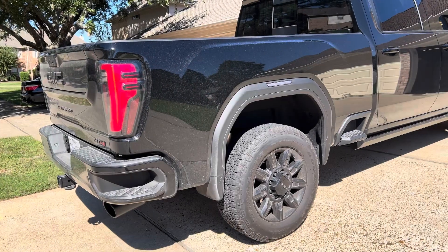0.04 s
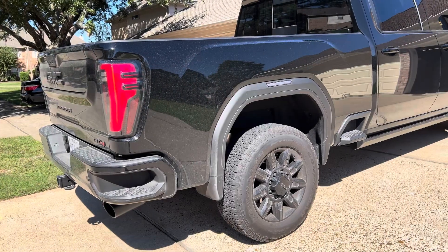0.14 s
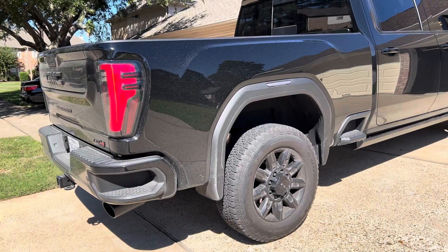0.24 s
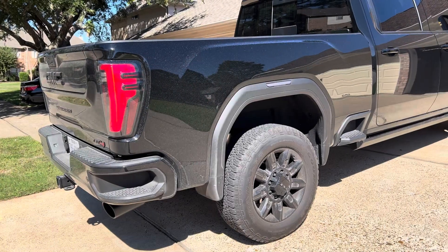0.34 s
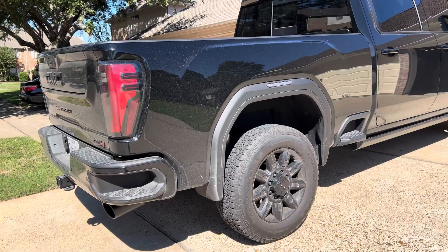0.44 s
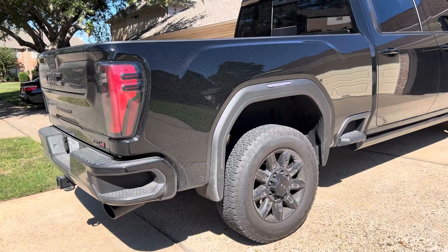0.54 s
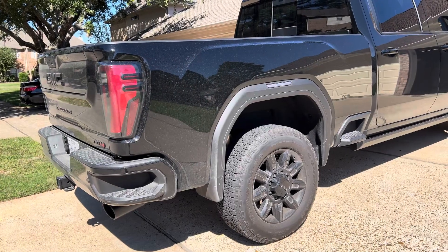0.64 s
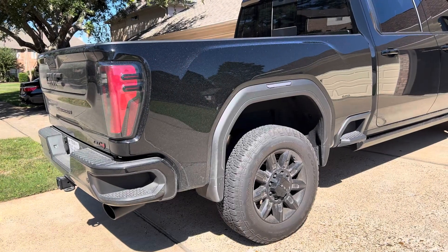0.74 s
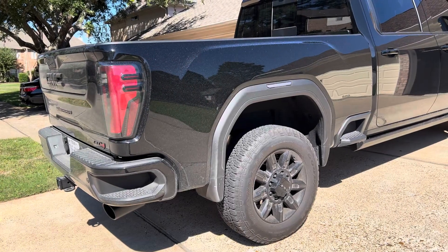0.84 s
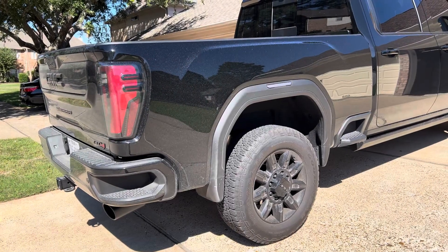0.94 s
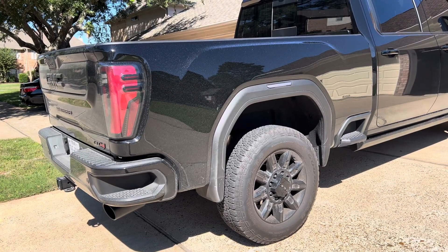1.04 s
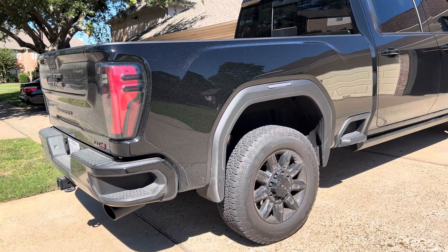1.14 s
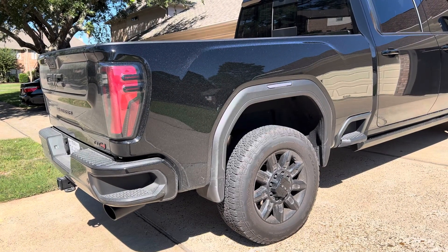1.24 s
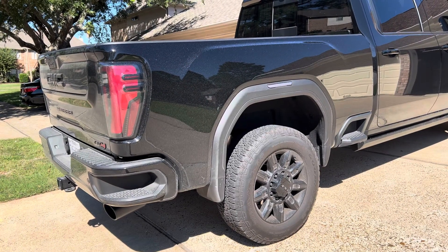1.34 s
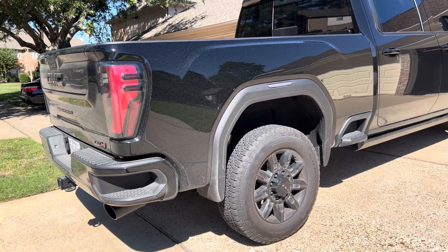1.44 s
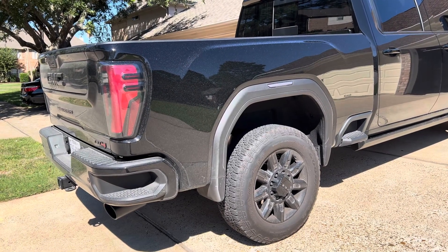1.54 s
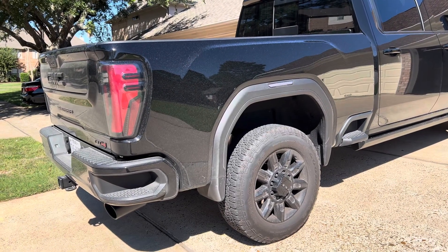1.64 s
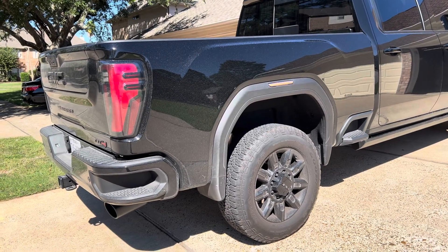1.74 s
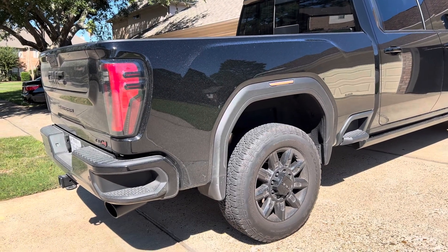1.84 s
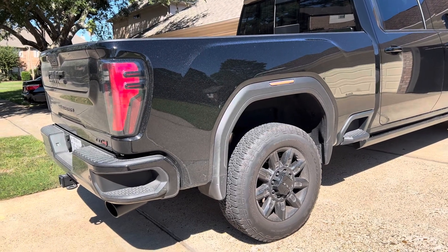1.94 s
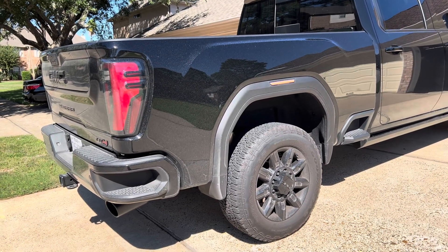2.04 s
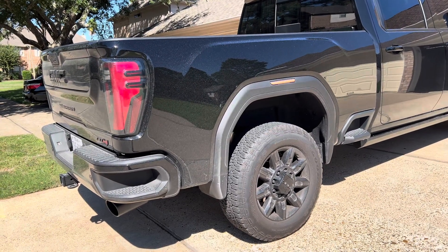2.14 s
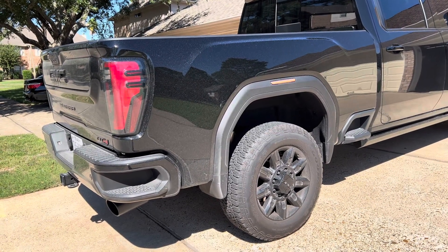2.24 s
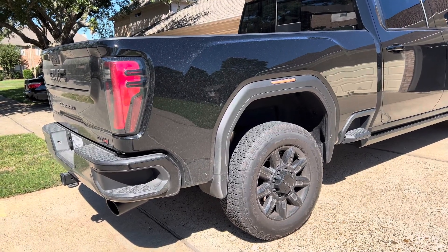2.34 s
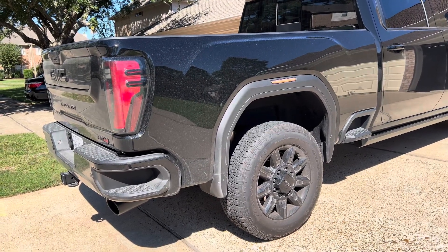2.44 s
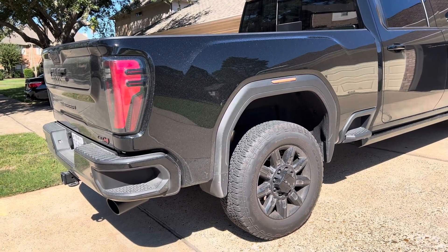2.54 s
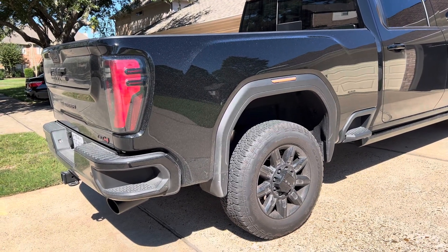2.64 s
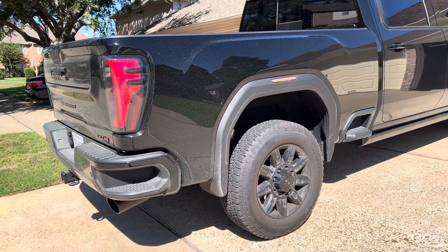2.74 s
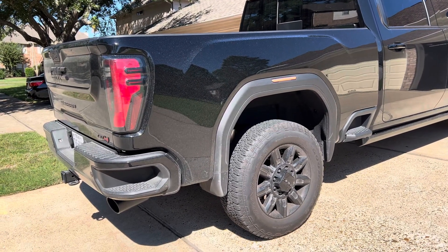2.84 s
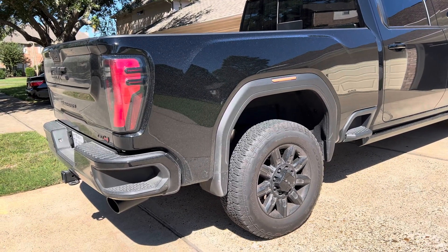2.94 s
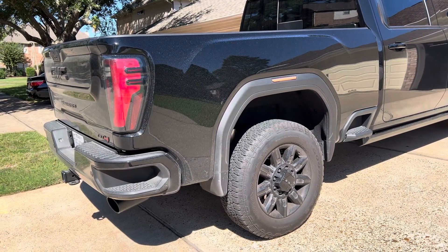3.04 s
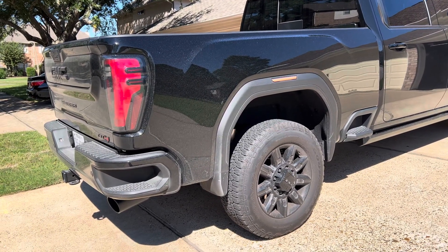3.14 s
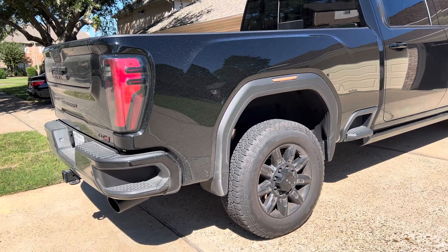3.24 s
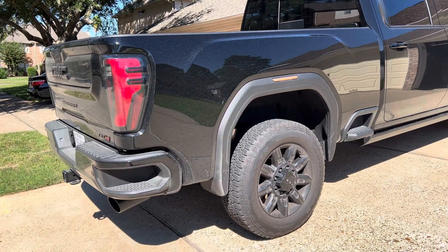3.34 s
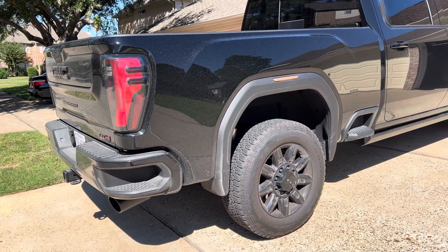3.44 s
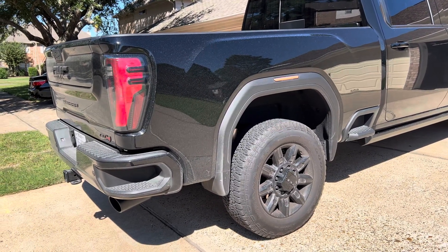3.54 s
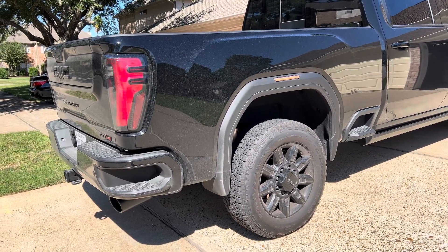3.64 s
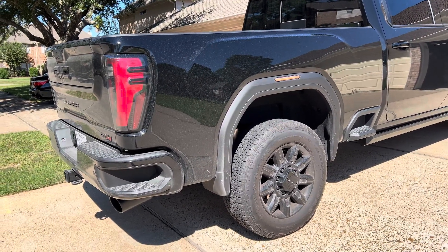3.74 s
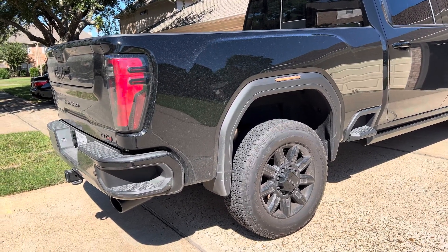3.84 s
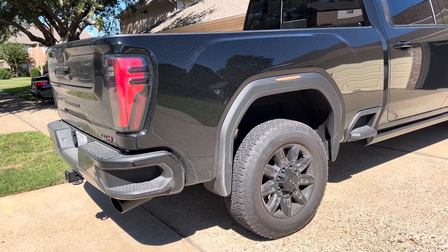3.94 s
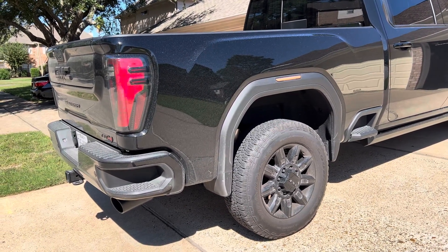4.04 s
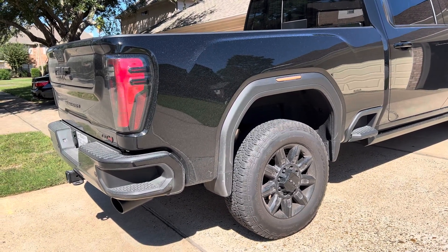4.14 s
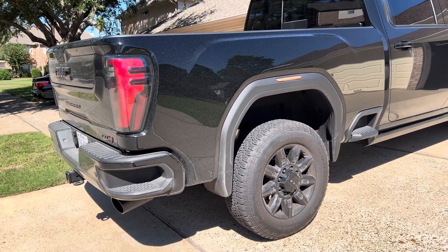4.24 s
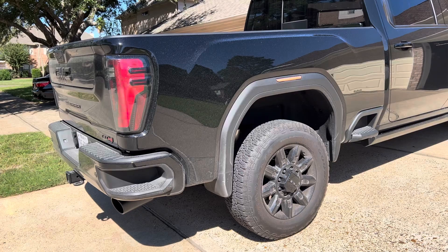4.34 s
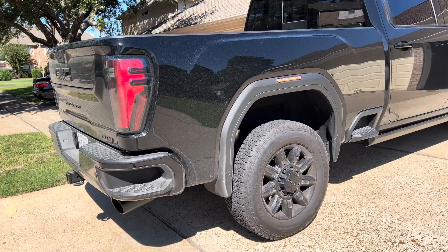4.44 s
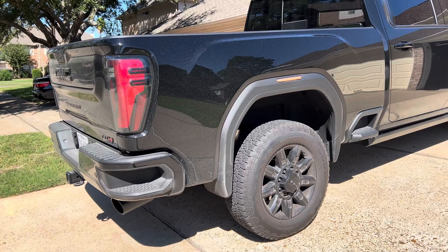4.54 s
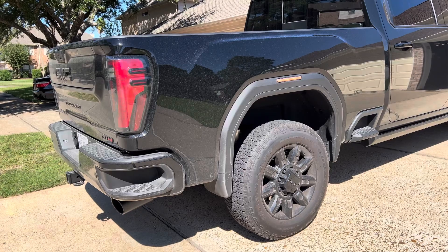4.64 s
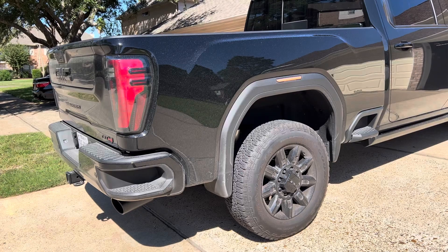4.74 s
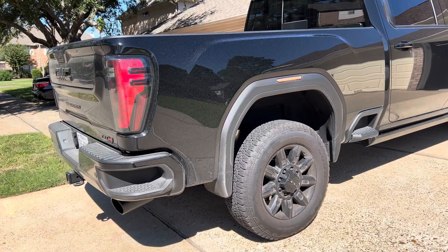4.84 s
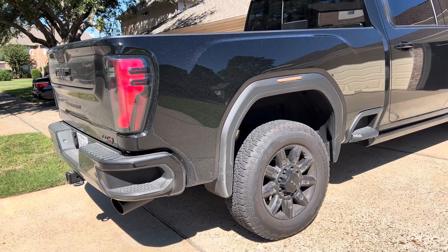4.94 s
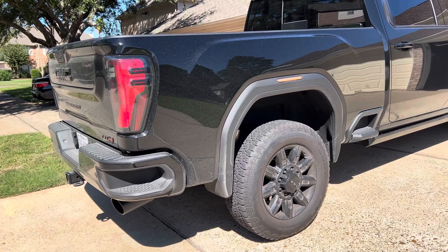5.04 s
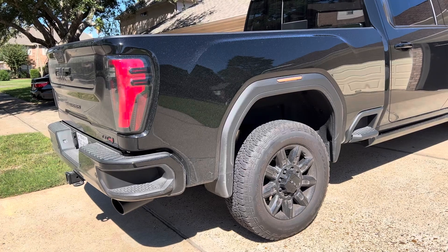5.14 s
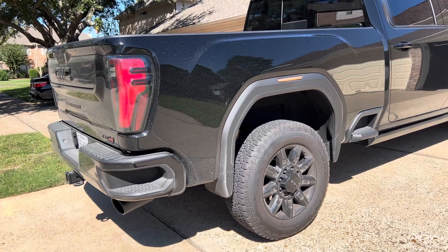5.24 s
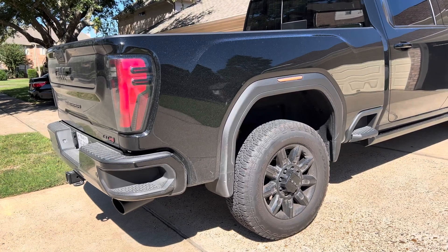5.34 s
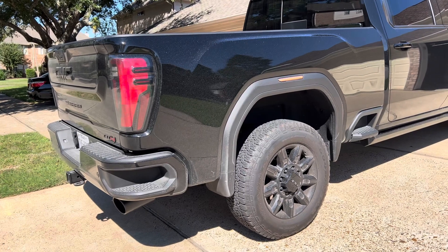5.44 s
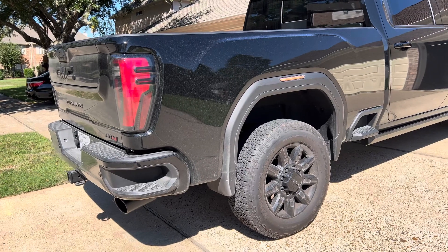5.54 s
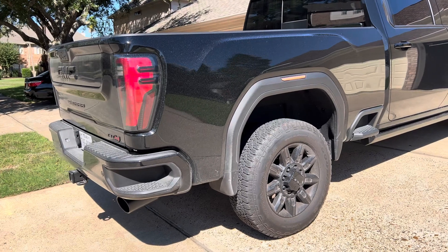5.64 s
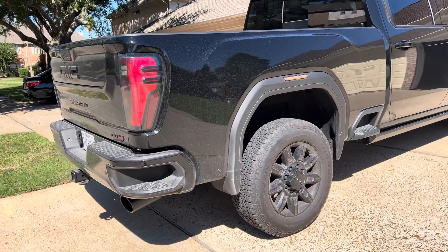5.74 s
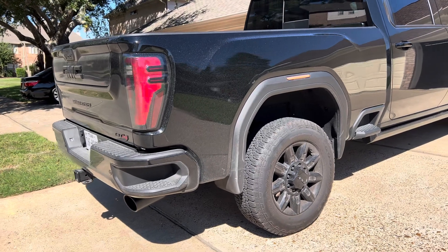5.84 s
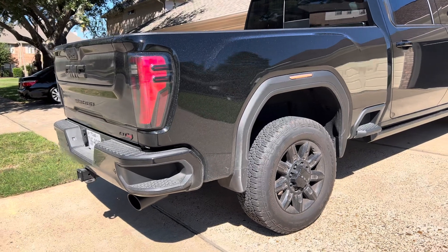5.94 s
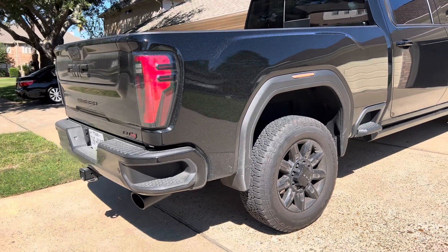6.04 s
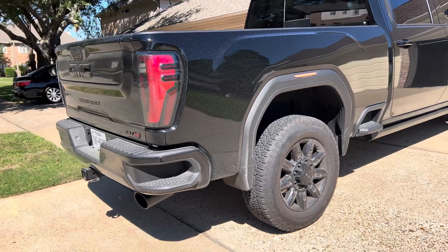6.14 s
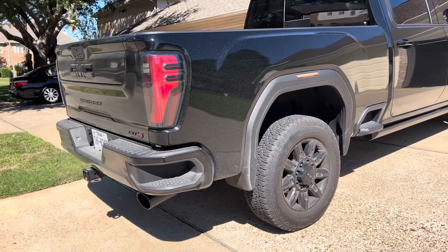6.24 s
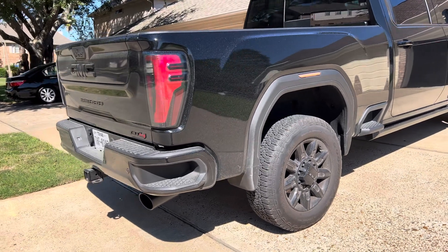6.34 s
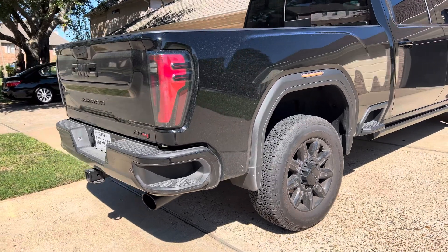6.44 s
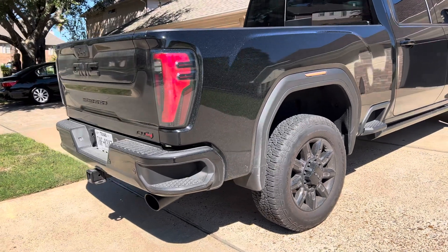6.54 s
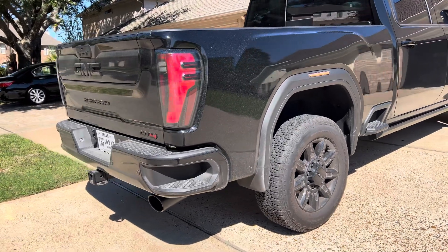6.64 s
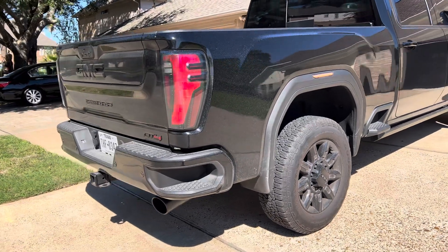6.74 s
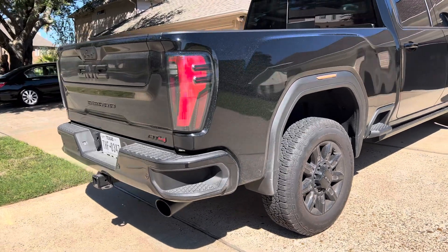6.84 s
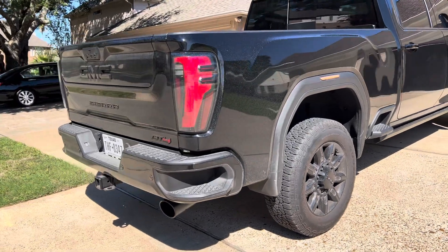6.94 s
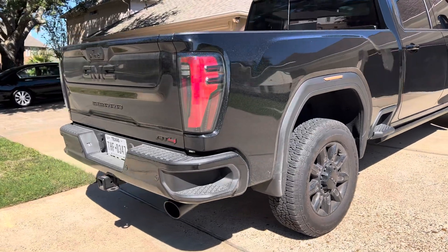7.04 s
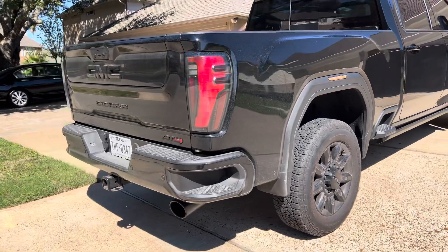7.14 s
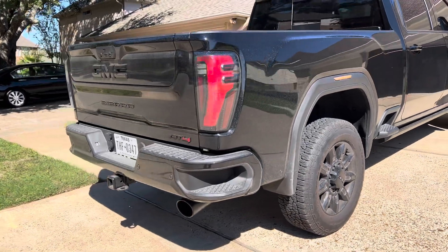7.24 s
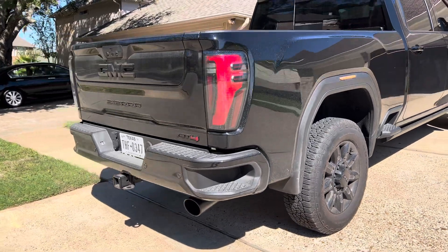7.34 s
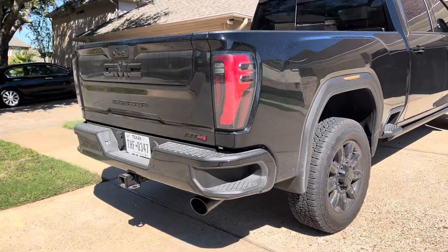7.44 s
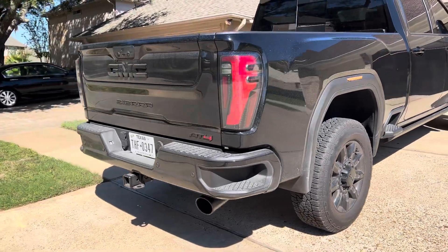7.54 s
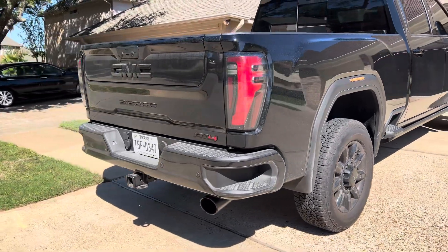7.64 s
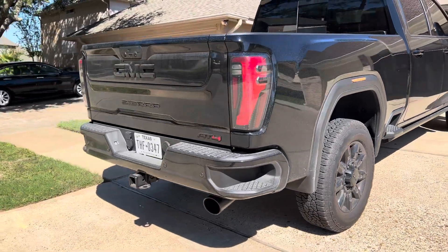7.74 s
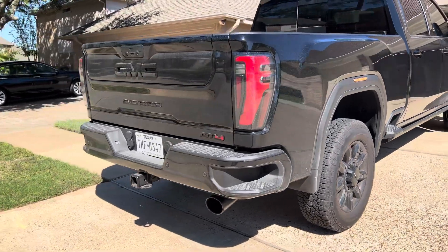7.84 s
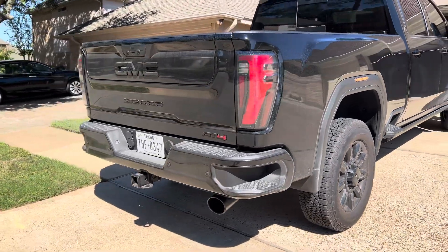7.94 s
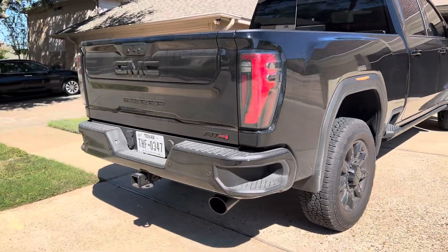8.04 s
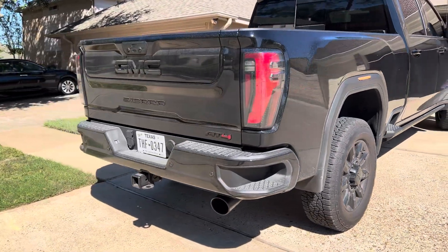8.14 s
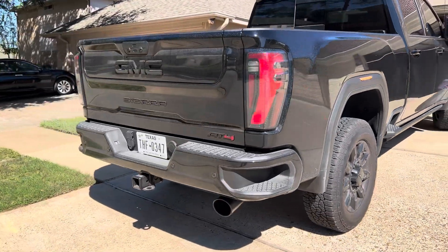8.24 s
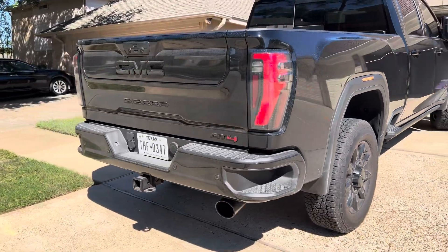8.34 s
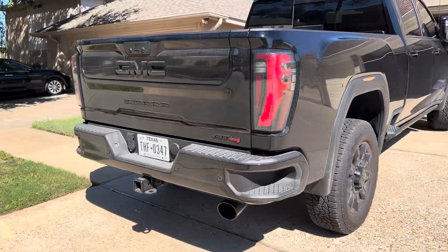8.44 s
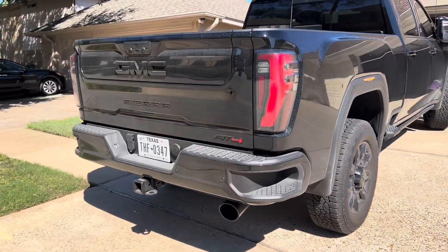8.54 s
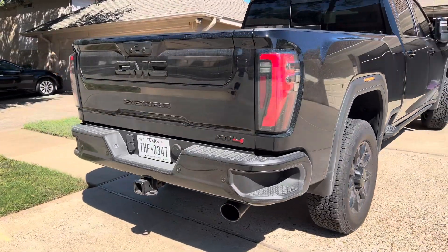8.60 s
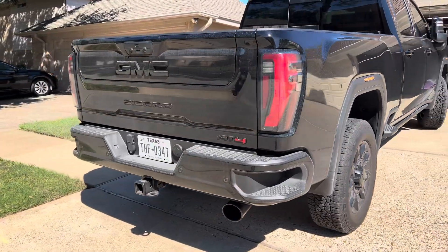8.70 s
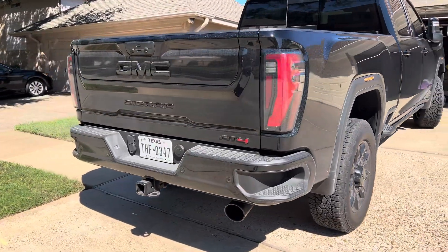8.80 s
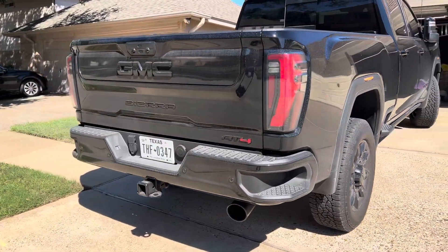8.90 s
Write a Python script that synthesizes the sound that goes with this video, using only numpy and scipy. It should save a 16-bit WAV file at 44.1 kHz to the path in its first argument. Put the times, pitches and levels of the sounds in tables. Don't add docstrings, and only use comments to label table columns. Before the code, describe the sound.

Faint fuel pump whine, rattling starter strokes, then a large truck engine fires up loudly and holds a throaty, burbling cold idle outdoors.

```python
import sys
import numpy as np
from scipy import signal
from scipy.fft import rfft, irfft, next_fast_len
from scipy.io import wavfile
from scipy.ndimage import uniform_filter1d

SR = 44100
rng = np.random.default_rng(int(sys.argv[2]) if len(sys.argv) > 2 else 0)


def voltage_ratio(level):
    return 10 ** (np.asarray(level, float) / 20)


def int16_out(signal):
    q = np.round(np.clip(np.atleast_2d(signal).T, -1, 1) * 32767)
    wavfile.write(sys.argv[1], SR, q.astype(np.int16))


N = 395577
T = np.arange(N) / SR
LATE = np.clip((T - 2) / 7, 0, 1)
QUARTER_TURN = np.array([[0], [.25]])


def evened(x):
    return x / np.sqrt(np.mean(x ** 2) + 1e-20)


def read(points, hz):
    f, value = np.transpose(points)
    return np.interp(np.log(hz + 1), np.log(f + 1), value)


def curves(rows):
    s, *columns = np.transpose(rows)
    on = uniform_filter1d(1. * (T > s[0]) * (T < s[-1]), size=300)
    return [np.interp(T, s, c) for c in columns] + [on]


def fade(since_s, time_s):
    return np.exp(-np.maximum(T - since_s, 0) / time_s)


def drift(hz):
    slow = signal.butter(1, hz, fs=SR, output="sos")
    return evened(signal.sosfiltfilt(slow, rng.standard_normal(N)))


def hiss(points, patchy_db):
    frames, hz = N // 256 + 5, np.fft.rfftfreq(1024, 1 / SR)
    a, b, c, d, patches = rng.standard_normal((frames, 513, 5)).T
    patches = uniform_filter1d(patches, size=10, axis=0)
    patches = evened(uniform_filter1d(patches, size=8, axis=1))
    colour_db = read(points, hz)[:, None]
    z = np.array([a + 1j * b, c + 1j * d]) * voltage_ratio(colour_db + patchy_db * patches)
    return evened(signal.istft(z, nperseg=1024, noverlap=768)[1][:, :N])


def resonate(x, hz, width):
    turn = np.exp(2j * np.pi * np.cumsum(hz * np.ones(N)) / SR)
    r = np.exp(-np.pi * width / SR)
    return 2 * (turn * signal.lfilter([1 - r], [1, -r], x / turn + 1e-18)).real


def tone(hz, waver):
    turns = np.cumsum(hz * (1 + waver * drift(30))) / SR
    return np.sqrt(2) * np.sin(2 * np.pi * (turns + QUARTER_TURN))


# time in seconds, firings per second.
SPEED = [(1.5, 78.7), (1.6, 82.1), (1.7, 90.85), (1.9, 94.76), (2.1, 93.17), (2.3, 89.0), (2.6, 87.8),
         (3.4, 85.33), (3.6, 83.76), (4.2, 84.12), (5.2, 82.03), (5.4, 82.72), (6.6, 82.23), (6.8, 81.18),
         (7.2, 82.58), (8.97, 80.3)]
FIRST_FIRING_S = SPEED[0][0]
FIRST_TURN = -.059
IDLE_RATE, CATCH_S = 82, 1.56


def cycles():
    rate, on = curves(SPEED)
    return np.cumsum(rate * (T > FIRST_FIRING_S)) / SR / 8 - FIRST_TURN, rate


# puff level in dB, pipe delay in ms, strength of the manifold echo (gain), echo delay in ms.
CYLINDERS = [
    (1.41, 4.74, 0.09, 12.0),
    (0.85, 4.31, 0.37, 8.28),
    (1.18, 4.41, 0.1, 8.91),
    (-0.52, 5.52, 0.43, 5.41),
    (0.16, 3.93, 0.47, 7.07),
    (1.4, 3.76, 0.28, 3.0),
    (-1.67, 4.13, -0.46, 5.28),
    (-0.86, 3.76, -0.71, 5.68),
]


def exhaust_puffs(turns):
    spread_db = 1.1 + 2.5 * fade(CATCH_S, .3)
    firings = 8 * turns
    at = np.flatnonzero(np.diff(np.floor(firings)) * (T[1:] > FIRST_FIRING_S))
    cylinder = np.floor(firings[at + 1]).astype(int) % 8
    puff_db, delay_ms, echo, echo_delay_ms = np.array(CYLINDERS)[cylinder].T
    chance = rng.standard_normal((len(at), 3))
    size = voltage_ratio(puff_db + .6 * spread_db[at] * chance[:, 0])
    start = at + (delay_ms + .05 * spread_db[at] * chance[:, 1]) * SR / 1000
    echo_start = start + echo_delay_ms * SR / 1000
    puffs = np.zeros(N + SR)
    np.add.at(puffs, start.astype(int), size)
    np.add.at(puffs, echo_start.astype(int), size * (echo + .035 * chance[:, 2]))
    return puffs[:N]


# frequency in Hz, level in dB.
PIPE = [(30, -33.4), (52, -15.8), (68, -24.2), (85, -21.1), (105, -15.4), (130, -21.2), (170, -26.4),
        (215, -26.3), (240, -54.3), (280, -44), (320, -40.9), (360, -50.5), (410, -47.8), (480, -62.8)]


def pipe_response():
    gain = np.log(voltage_ratio(read([*PIPE, (900, -100)], np.fft.rfftfreq(4096, 8 / SR))))
    fold = np.r_[1, 2 * np.ones(2047), 1, np.zeros(2047)]
    ring = irfft(np.exp(rfft(irfft(gain) * fold)))[:2048]
    return signal.resample_poly(ring, 8, 1)


# multiple of the engine cycle, level against the note in dB at the flare, the same at the end.
OVERTONES = [(23, -19.5, -24.5), (24, -38.5, -30), (30, -25, -29), (32, -32.5, -34.5), (40, -55, -27.5)]


def exhaust_note(puffs, turns, rate):
    note = signal.oaconvolve(puffs, pipe_response())[:N]
    note /= np.sqrt(uniform_filter1d(note ** 2, size=16384) + 1e-12)
    note += (.7 - 1.277 * LATE ** 0.88) * resonate(note, 2 * rate, 42)
    note += 0.18 * np.exp(-abs(T - 1.9) / 0.46) * resonate(note, rate, 5.1)
    note += (2.2 - 2.27 * LATE) * resonate(note, 21 / 8 * rate, 1.8)
    overshoot_db = 0.3 * np.maximum(rate - 88, 0)
    for k, early_db, late_db in OVERTONES:
        db = early_db + (late_db - early_db) * LATE + 2.2 * drift(16.0) - overshoot_db
        note += voltage_ratio(db) * np.sqrt(2) * np.sin(2 * np.pi * (round(k) * turns + rng.random()))
    return note


# frequency in Hz, width in Hz, level in dB, extra level in the flare in dB.
CRACK = [(311.2, 18.2, 4.5, -0.5), (339.2, 15, -10, 12), (410, 18.3, -2.5, 2), (506.7, 26, -10.5, 2),
         (622, 23, -22, -1), (723, 16, -18.5, 0), (806, 17, -26, 7.5)]


def pipe_crack(puffs, lope):
    sharp = puffs * lope * voltage_ratio(1.2 * rng.standard_normal(N))
    crack = np.zeros(N)
    for hz, width, db, hot_db in CRACK:
        ring = resonate(resonate(sharp, hz, width), hz, 3 * width)
        crack += voltage_ratio(db + hot_db * fade(2.0, 0.19)) * evened(ring)
    both = evened(np.array([crack, np.roll(crack, shift=95)]))
    hot_db, near_db = 3, -2.5
    return voltage_ratio(2 + hot_db + (near_db - hot_db) * LATE) * both


# start in seconds, pitch in Hz, peak level in dB, seconds to die away by 60 dB.
FIRST_BANGS = [
    (1.516, 97.8, -0.5, 0.19),
    (1.571, 76, -9, 0.1),
]


def first_bangs():
    since = T - np.array(FIRST_BANGS)[:, :1]
    hz, bang_db, t60 = np.array(FIRST_BANGS).T[1:, :, None]
    onset = np.clip(since / 0.004, 0, 1)
    return (voltage_ratio(bang_db - 60 * abs(since) / t60) * np.sin(2 * np.pi * hz * since) * onset).sum(0)


# start in seconds, peak level in dB.
POPS = [
    (1.702, -18),
    (1.757, -20),
    (1.79, -22.5),
    (1.811, -22.5),
    (2.014, -21),
    (7.982, -36),
    (8.475, -35),
    (8.572, -45.5),
    (8.871, -31.5),
]


def pops():
    since = T - np.array(POPS)[:, :1]
    ring = np.sin(2 * np.pi * 810 * since)
    ring += 0.6 * np.sin(2 * np.pi * 520 * since)
    ring += 0.3 * np.sin(2 * np.pi * 1200 * since)
    decay = voltage_ratio(np.array(POPS)[:, 1:] - 3.5 - 60 * abs(since) / 0.018)
    return (decay * ring * (since > 0)).sum(0)


# time in seconds, level in dB.
EXHAUST = [(1.495, -41.5), (1.52, -20), (1.55, -15.5), (1.62, -7.5), (1.85, -7.5), (2.2, -10), (3, -12),
           (3.6, -13.7), (5, -15), (6, -14), (7.5, -12), (8.5, -11), (9.1, -9)]
# frequency in Hz, level in dB per Hz.
RUSH = [(150, -37), (250, -6), (269, -12), (318, -13), (411, -16), (468, -18.5), (618, -25), (797, -20),
        (919, -55), (1100, -34), (1430, -70), (2420, -120)]


def exhaust():
    level_db, on = curves(EXHAUST)
    turns, rate = cycles()
    puffs = exhaust_puffs(turns)
    note = exhaust_note(puffs, turns, rate)
    lope_db = 2.5 * np.cos(2 * np.pi * (8 * turns - .78)) + 2.5 * np.cos(2 * np.pi * (2 * turns - .33))
    lope = voltage_ratio(lope_db)
    rush_db = level_db - 32 + 0.76 * (rate - IDLE_RATE) + 17.5 * fade(CATCH_S, 0.051)
    nearing = voltage_ratio(1.5 * LATE ** 3)
    rush = nearing * lope * hiss(RUSH, patchy_db=1.5) + pipe_crack(puffs, lope)
    return on * (voltage_ratio(level_db) * note + voltage_ratio(rush_db) * rush + first_bangs() + pops())


# frequency in Hz, level in dB per Hz.
BAY_HISS = [(530, -40.5), (900, -7), (1450, -6), (2460, -7.5), (3320, -5), (4160, -11), (5040, -7.5),
            (5610, -11), (7480, -20), (9850, -20), (11500, -19.5), (13300, -27.5), (15700, -22.5)]
# frequency in Hz, width in Hz, level over the hiss in dB.
BAY_RINGS = [(778.6, 49, -9), (1390, 36, -14), (1481, 51, -14)]
# time in seconds, level in dB.
PULLEY = [
    (2.2, -79),
    (2.6, -66),
    (3.6, -69),
    (4.8, -64),
    (5.7, -68.5),
    (6.1, -82),
]


def engine_bay():
    on = np.clip((T - FIRST_FIRING_S) / 0.034, 0, 1) ** 2
    away_db = -1.08 * np.maximum(T - 6.73, 0)
    hiss_db = -49.5 + 9.5 * fade(1.89, .6) + away_db
    unloaded = np.clip((2.95 - T) / .3, 0, 1)
    whine_db = -59 + 2.5 * drift(1.5) + 6 * fade(3.3, .4) - 25 * unloaded + away_db
    turns, rate = cycles()
    noise = hiss(BAY_HISS, patchy_db=1.13)
    white = rng.standard_normal((2, N))
    for hz, width, db in BAY_RINGS:
        noise += voltage_ratio(db) * evened(resonate(white, hz, width))
    beat = voltage_ratio(.4 * np.cos(2 * np.pi * (3 * turns - .5)) + .8 * drift(40))
    whine = voltage_ratio(whine_db + 4 * drift(15)) * tone(62.3 * rate, waver=.004)
    pulley_db, facing = curves(PULLEY)
    whine += facing * voltage_ratio(pulley_db + 3.5 * drift(10)) * tone(1822, waver=.003)
    return on * (voltage_ratio(hiss_db) * beat * noise + whine)


# start in seconds, effort in dB, level of the pinion gear's knock in dB.
STROKES = [
    (0.654, -26, -25),
    (0.732, -30.5, -37.5),
    (0.994, -29.5, -25.5),
    (1.127, -30, -20),
    (1.237, -31, -20),
    (1.324, -29.5, -18),
    (1.416, -27, -25),
    (1.498, -31.5, -39.5),
]
RELEASE_S = 1.72


def strokes(sag_db, bend, rise_s=0.0046):
    s, effort_db, knock_db = np.transpose(STROKES)
    k = np.maximum(np.searchsorted(s, T) - 1, 0)
    done = np.clip((T - s[k]) / np.diff(np.r_[s, RELEASE_S])[k], 0, 1)
    run_down_db = 299.5 * np.maximum(T - RELEASE_S, 0)
    db = effort_db[k] - sag_db * done ** bend - run_down_db
    keep = np.exp(-1 / (rise_s * SR))
    return signal.lfilter([1 - keep], [1, -keep], voltage_ratio(db) * (T > s[0] - .006))


# start in seconds, length in seconds, pitch in Hz, level in dB.
SQUEALS = [(.655, .025, 4200, -38), (.67, .03, 4630, -40), (.715, .03, 1990, -33), (.73, .03, 4290, -42),
           (.82, .05, 3880, -43), (.85, .035, 4720, -41), (.88, .04, 1990, -35), (.915, .04, 1980, -39),
           (.81, .09, 1260, -37), (.9, .04, 4730, -41), (1.01, .03, 4120, -40), (.995, .05, 4750, -44),
           (1.125, .045, 4730, -41), (1.24, .05, 1995, -40), (1.41, .06, 1985, -35), (.995, .05, 1990, -41),
           (1.13, .08, 785, -41), (1.33, .05, 785, -41), (1.53, .09, 785, -40), (.995, .04, 6000, -46)]
# start in seconds, length in seconds, starting pitch in Hz, level in dB.
WHISTLES = [
    (.73, .07, 3100, -44),
    (.77, .05, 4600, -43),
    (.945, .045, 3700, -43),
    (1.05, .045, 3700, -41),
    (1.15, .085, 4250, -43),
]


def squeals():
    out = np.zeros((2, N))
    strays = rng.uniform((STROKES[0][0], .02, 3000, -48), (1.6, .05, 5800, -43), (22, 4))
    steady = [(*row, 0) for row in SQUEALS]
    rising = [(*row, 10500) for row in [*WHISTLES, *strays]]
    for s, length, start_hz, db, glide in steady + rising:
        t = np.arange(round(length * SR)) / SR
        wobble = 1 + 3 * uniform_filter1d(rng.standard_normal(4410), size=200)[:len(t)]
        turns = np.cumsum((start_hz + glide * t) * (1 + 0.056 * (wobble - 1))) / SR
        swell = voltage_ratio(db + 5) * wobble ** 3 * np.sin(np.pi * t / length)
        at = round(s * SR)
        out[:, at:at + len(t)] += swell * np.sin(2 * np.pi * (turns + QUARTER_TURN))
    return out


# frequency in Hz, level in dB per Hz.
FIZZ_HISS = [(4410, -33.5), (7500, -6.5), (9930, -5), (11100, -7.5), (12900, -15), (15800, -9)]


def gear_fizz():
    overrun = T > STROKES[-1][0]
    gain = voltage_ratio(-18.5 + 5.5 * overrun) * strokes(sag_db=15, bend=3.9)
    gain += overrun * voltage_ratio(-49 - 25 * (T - RELEASE_S))
    return gain * voltage_ratio(1.4 * drift(70)) * hiss(FIZZ_HISS, patchy_db=2)


# frequency in Hz, level in dB per Hz.
CRANK_HISS = [(24, -31), (40, -8), (361, -14.5), (440, -11), (783, -6), (1000, -15), (1430, 0.5),
              (1740, -13.5), (1970, -8), (2600, -8.5), (4850, -11), (8410, -20.5), (9770, -25.5),
              (11300, -21.5), (15700, -41.5)]
# frequency in Hz, width in Hz, level in dB.
HOUSING = [(275, 49, -9.5), (781, 31, 6), (1450, 310, -7), (1980, 96, -5.5), (3660, 160, -13.5),
           (4110, 58, -5), (4720, 73, -13), (5990, 61, 3), (8260, 57, -19)]


def starter():
    teeth = rng.standard_normal((2, N)) * voltage_ratio(1.5 * drift(60))
    housing = np.zeros((2, N))
    for hz, width, db in HOUSING:
        housing += voltage_ratio(db + 5 * drift(25)) * evened(resonate(teeth, hz, width))
    rough = voltage_ratio(.8 * drift(80) + 0.64 * drift(500))
    grind = rough * (hiss(CRANK_HISS, patchy_db=1.5) + voltage_ratio(-1.5) * evened(housing))
    low_ring = evened(resonate(resonate(teeth, 265, 170), 265, 170))
    thrum = voltage_ratio(-10) * strokes(sag_db=8, bend=1.5, rise_s=.012) * low_ring
    since = T[None] - np.array(STROKES)[:, :1]
    knock_db = np.array(STROKES)[:, 2:] - 8.5 - 60 * abs(since) / 0.24
    knocks = (voltage_ratio(knock_db) * (since > 0)).sum(0) * hiss(CRANK_HISS, patchy_db=-2)
    return strokes(sag_db=13, bend=3.04) * grind + thrum + gear_fizz() + squeals() + knocks


# frequency in Hz, level in dB.
PUMP_TONES = [(1125, -76), (1776, -82)]


def fuel_pump():
    on_s, off_s, spin_up_s, pressure_s = .15, .66, .022, 0.066
    since = np.maximum(T - on_s, 0) / spin_up_s
    hz = 11530 * (1 - np.exp(-since) * (.08 - .16 * since))
    on = uniform_filter1d(1. * (T > on_s) * (T < off_s), size=900)
    hum_db = -63 - 14 * np.clip(1 - (T - on_s) / pressure_s, 0, 1)
    whine = tone(hz, waver=.003) + voltage_ratio(-5) * tone(hz / 2, waver=.0005)
    sound = voltage_ratio(-70 + 2.5 * drift(12)) * whine
    for f, db in PUMP_TONES:
        sound += voltage_ratio(db + hum_db + 72 + 1.5 * drift(20)) * tone(f, waver=.006)
    return on * (sound + voltage_ratio(hum_db) * hiss(BAY_HISS, patchy_db=1.2))


def breeze():
    rustle = evened(resonate(rng.standard_normal((2, N)), 380, 350))
    return voltage_ratio(-59.5) * fade(.08, .1) * rustle


# frequency in Hz, level in dB per Hz.
STREET = [(18, -39), (30, -1), (86, 6.5), (285, -18), (352, -16), (495, -30), (549, -17), (626, -31.5),
          (1270, -27.5), (1410, -35.5), (2710, -26), (8370, -63), (15700, -43.5)]


def street():
    gain = voltage_ratio(-44.5 - 6.5 * np.minimum(T, STROKES[0][0]))
    gain += voltage_ratio(-12) * strokes(sag_db=13.5, bend=1.3, rise_s=.015)
    return gain * hiss(STREET, patchy_db=1.0)


def scene():
    return exhaust() + engine_bay() + starter() + fuel_pump() + breeze() + street()


def top_cut(x):
    return signal.sosfilt(signal.butter(12, 15960, fs=SR, output="sos"), x)


# frequency in Hz, lead in radians.
LEAD = [(0, 0), (520, -0.3), (1550, -2.1), (2070, -7.9), (2500, -9.1), (5170, -13.7), (8100, -24.9),
        (8870, -22), (10200, -22), (11100, -18.9), (12700, -18.8), (13400, -15.7), (15100, -15.7),
        (15500, -14.5)]
# frequency in Hz, left over right in dB.
BALANCE_DB = [(60, -1.0), (110, -1.0), (200, -1.0), (380, -1.0), (700, -1.0), (1290, -4.0), (2380, 0.5),
              (4400, 0.0), (8120, 1.0), (8900, 0.0)]
# frequency in Hz, likeness from 0 to 1.
SAME = [(60, 0.93), (250, 1), (500, 0.98), (1000, 0.31), (2000, 0.64), (4000, 0.58), (8000, 0.54),
        (8900, 0.45)]


def record(dry):
    size = next_fast_len(N + 8192)
    hz = np.fft.rfftfreq(size, 1 / SR)
    steady = uniform_filter1d(uniform_filter1d(dry, size=2048), size=2048)
    padded = np.pad(dry - steady, ((0, 0), (0, 1024)), "reflect", reflect_type="odd")
    ending = np.clip((N + 1024 - np.arange(N + 1024)) / 1024, 0, 1)
    bass_cut = (hz / np.hypot(hz, 22)) ** 4
    direct, diffuse = rfft(padded * ending, size) * bass_cut
    treble = hz > 8900
    same = np.clip(read(SAME, hz) + treble, 0, np.where(treble, .965, 1))
    unlike = np.sqrt(1 - same ** 2)
    lead = np.interp(hz, *np.transpose(LEAD)) - .06 * np.exp(-hz / 300)
    balance = voltage_ratio(read(BALANCE_DB, hz) / 2)
    left = direct * np.exp(.5j * lead) * balance
    right = (same * direct + unlike * diffuse) * np.exp(-.5j * lead) / balance
    right /= np.where(hz < 300, same + unlike, 1)
    both = irfft(np.array([left, right]), size)[:, :N]
    limited = both / (1 + abs(both / .97) ** 6) ** (1 / 6)
    return top_cut(limited)


dry = scene()
out = record(dry)
int16_out(out)
```